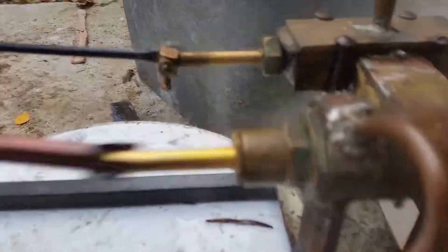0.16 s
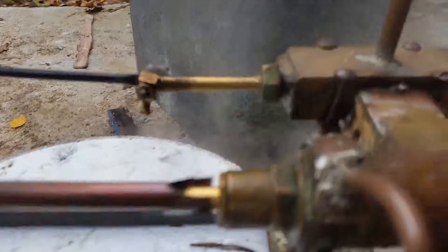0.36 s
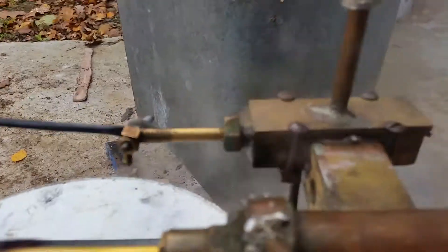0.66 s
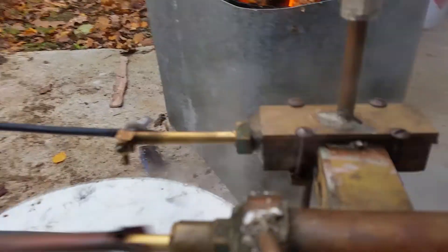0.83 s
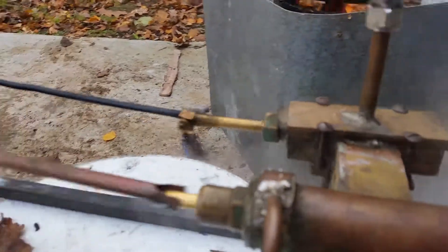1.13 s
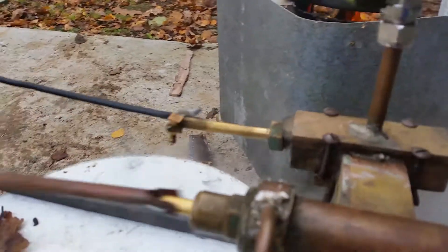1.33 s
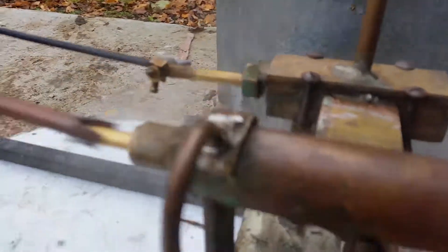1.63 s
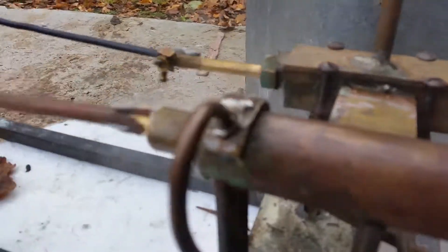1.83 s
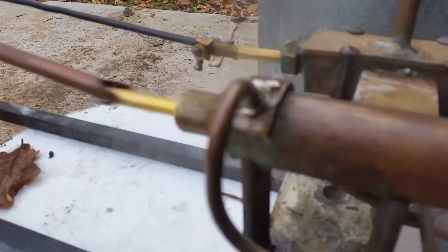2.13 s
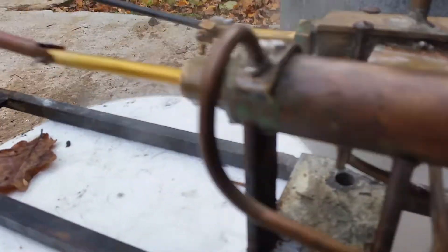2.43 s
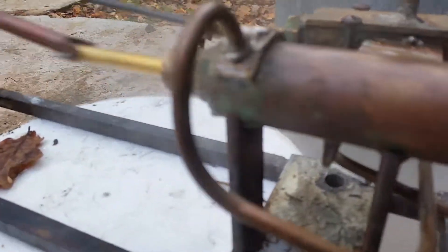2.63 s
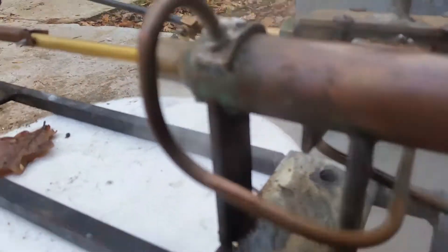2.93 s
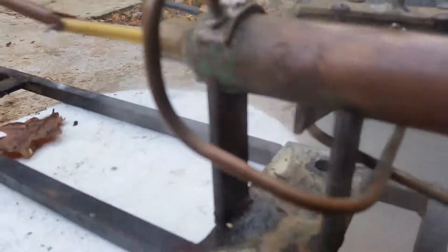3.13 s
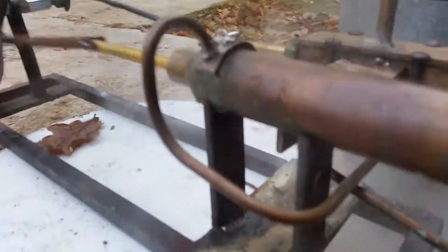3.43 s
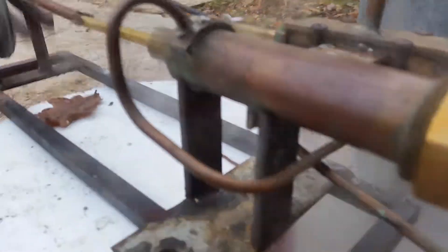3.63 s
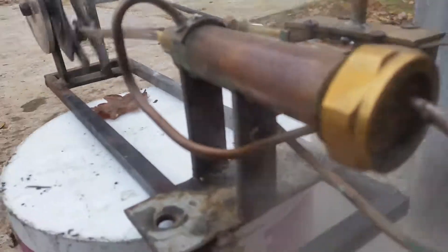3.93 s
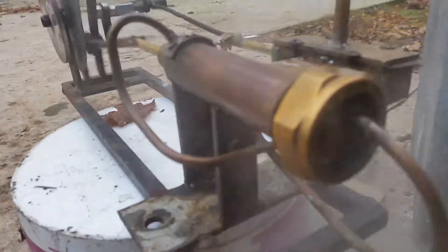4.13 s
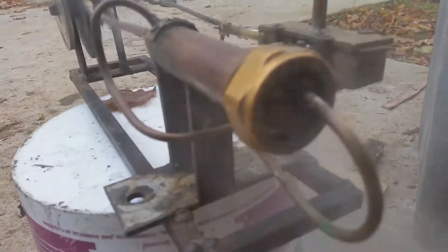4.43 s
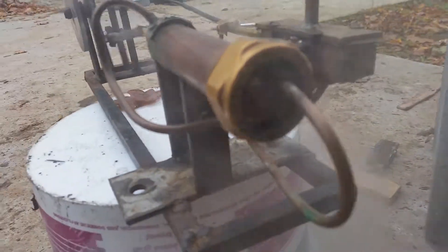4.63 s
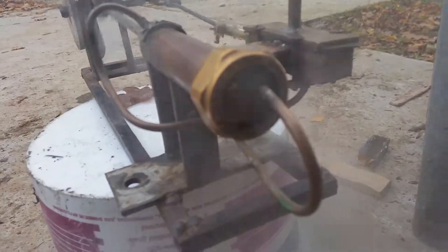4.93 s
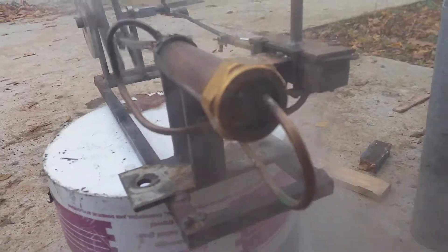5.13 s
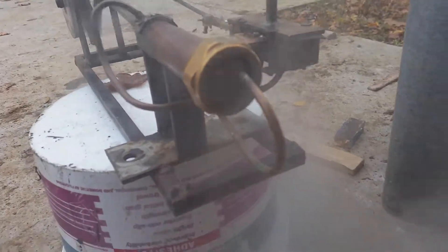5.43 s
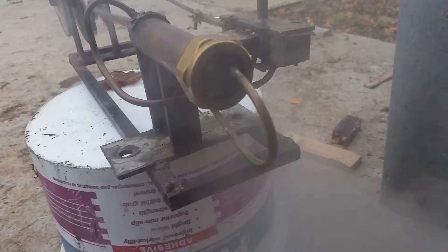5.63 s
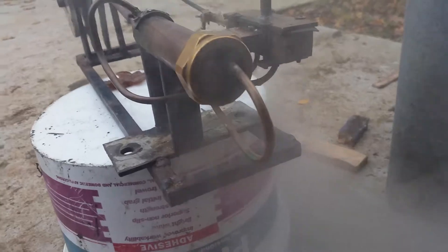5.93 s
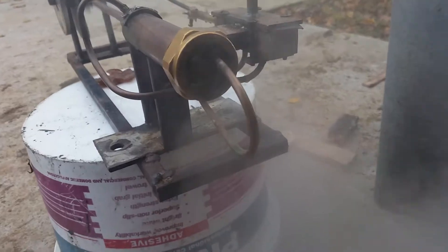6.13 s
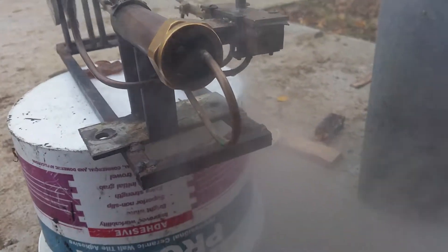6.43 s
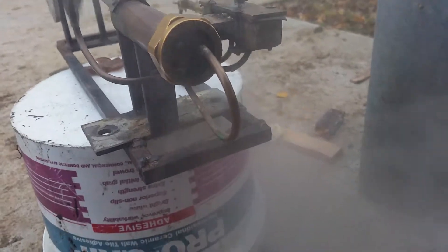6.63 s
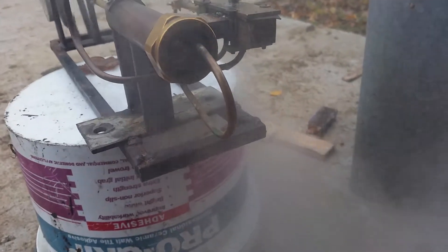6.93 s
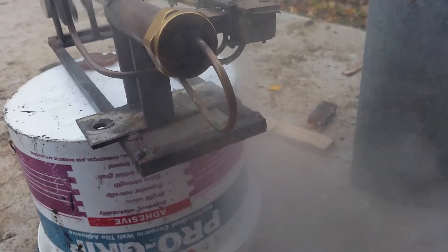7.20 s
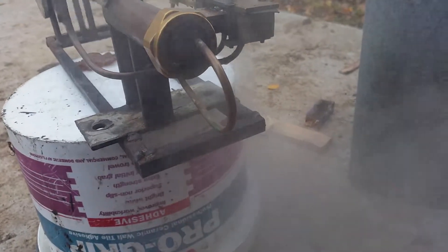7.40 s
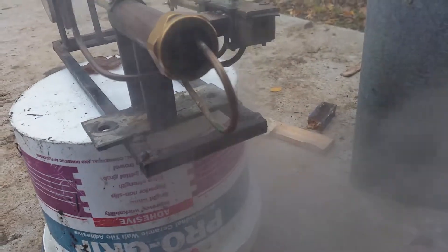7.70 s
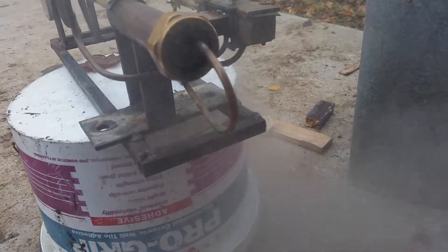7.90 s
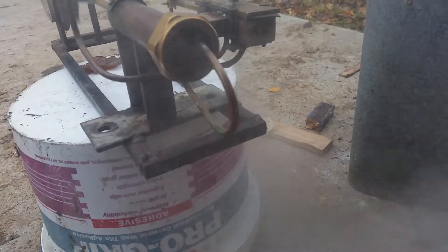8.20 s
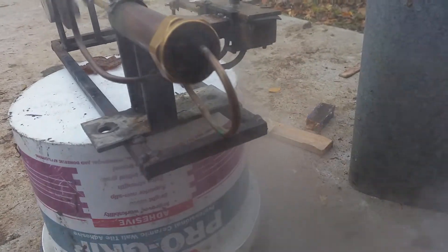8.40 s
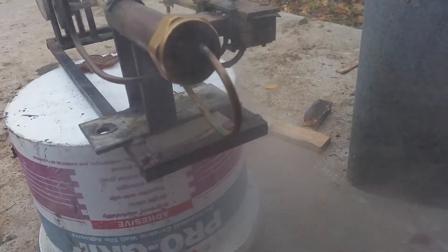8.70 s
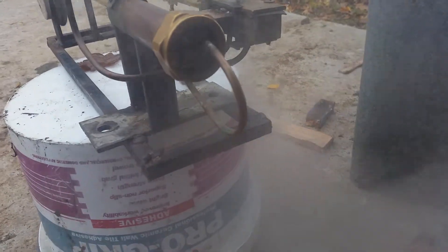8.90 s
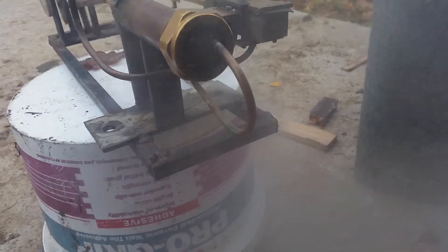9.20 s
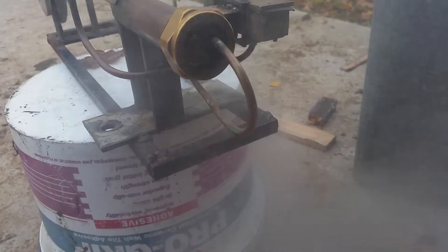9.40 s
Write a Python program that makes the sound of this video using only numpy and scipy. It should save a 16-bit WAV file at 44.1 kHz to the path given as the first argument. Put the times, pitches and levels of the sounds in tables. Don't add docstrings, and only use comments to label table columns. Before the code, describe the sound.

A rapid chuff-hiss rhythm continues from start to finish, with crisp valve ticks and a hollow iron clatter. The steam begins bright and leaning right, sweeps as the handheld microphone passes round the engine, then becomes more piped from behind while ticks fade on the left. Water splats twice at the exhaust, blunt pops strike the left side, and a low hum swells faintly under open-air fire rumble.

```python
import sys
import numpy as np
from scipy import signal
from scipy.fft import rfft, irfft, next_fast_len
from scipy.io import wavfile
from scipy.ndimage import uniform_filter1d, map_coordinates

SR = 44100
rng = np.random.default_rng(int(sys.argv[2]) if len(sys.argv) > 2 else 0)


def output_pcm(signal):
    pcm = np.clip(np.atleast_2d(signal).T, -1, 1) * 32767
    wavfile.write(sys.argv[1], SR, np.round(pcm).astype(np.int16))


def ratio_of_db(decibels):
    return 10 ** (np.asarray(decibels, float) / 20)


N = 421148
CLOCK = np.arange(N) / SR

# (time [s], pitch [Hz], level [dB])
HUM = [(0, 45.5, -42), (1.25, 44.1, -42), (1.6, 43.6, -57), (2.3, 37, -47), (3.3, 37, -49), (3.6, 37, -37),
       (4.36, 37.1, -40), (5.3, 41.8, -36.5), (6.1, 43, -39), (6.6, 42.5, -39), (7.45, 44.8, -31.5),
       (8.24, 45.2, -37.5), (9.2, 45.6, -33), (9.55, 45, -37)]
OCTAVE_DB = -6.5
# (frequency [Hz], density [dB per Hz])
RUMBLE = [(20, -23), (60, -3), (120, -10), (220, -2), (330, -3), (700, -14), (1500, -22.5)]

# (time [s], left level [dB], right minus left [dB])
POPS = [
    (2.6243, 2.5, -22),
    (5.4147, -0.5, -19),
    (6.126, 5, -27),
    (8.0773, -1, -22),
    (8.901, -4, -18),
]
LOUDEST_POP_S = POPS[2][0]
# (time [s], peak level [dB], pan [dB])
SPLATS = [
    (1.4277, -9.5, -1),
    (6.933, -13.5, -13),
]
GAIN_DROP_DB, GAIN_FALL_S, GAIN_HOLD_S, GAIN_RISE_S, GAIN_STEP = -9, 0.36, 0.39, 0.67, 0.34

# (time [s], turns done [count])
CRANK = [(.0831, 0), (1.0835, 4), (1.331, 5), (1.5739, 6), (2.2901, 9), (2.7698, 11), (3.0041, 12),
         (3.9546, 16), (4.6719, 19), (5.3975, 22), (5.8752, 24), (6.363, 26), (6.8383, 28), (7.5601, 31),
         (8.0368, 33), (8.2783, 34), (8.7486, 36), (9.481, 39)]
# (part of a turn [0-1], barrel level [dB], frame level [dB], rod level [dB])
KNOCKS = [(.01, -6.5, -6.5, 2), (.04, -14, -16.5, -0.5), (.1, -13, -18.5, -22), (.26, -13.5, -9, 2.5),
          (.35, -9.5, -11.5, -1.5), (.41, -12, -12.5, -6.5), (.56, -13, -17, -15.5), (0.74, -9.5, -6, -1.5),
          (0.798, -10.5, -12.5, -3.5)]
# (frequency [Hz], width [Hz], level [dB])
BARREL = [(89, 20, -12.5), (126.1, 15.3, 3), (162.9, 14.4, 0), (206, 16.4, -1.5), (254, 32.6, -5.5)]
# (frequency [Hz], width [Hz], level [dB])
FRAME = [(375, 54, 0.5), (455.6, 18.5, 7.5), (498.3, 18.2, 7), (592.6, 25, 4), (785, 102, 0)]
# (frequency [Hz], width [Hz], level [dB])
ROD = [(861.6, 15, 7), (934, 122, 7), (1101, 15.7, 14), (1194, 70, 6.5), (1750, 720, -40)]
KNOCK_DB, KNOCK_SCATTER_DB = 1.8, 0.95

# (frequency [Hz], level [dB], decay by 60 dB [s])
VALVE = [(8040, -27, 0.022), (10110, -7, 0.011), (10975, -1.5, 0.053), (10810, 9, 0.0068),
         (12970, -28, 0.01), (14400, -9, 0.013)]
SOFT_TURNS = [0, 1, 7, 10, 13, 16, 21, 24, 27, 31, 36]
SOFT_DB, TICK_SCATTER_DB, CLACK_DB = -5, 0.8, -16.5
TICK_DB = (-3.5, -1)
HIDDEN_S, HIDDEN_DB = 3.85, (-10, 1.5)

# (part of a turn [0-1], level [dB])
FIRST = [(.01, -18), (.04, -6.5), (.1, -1.5), (.2, 4.5), (.3, 1.5), (.345, -6.5), (.37, -70)]
# (part of a turn [0-1], level [dB])
SECOND = [(.38, -7), (.44, -11.5), (.5, 0.5), (.62, -2), (.75, -2.5), (.84, -3), (.9, -55), (.92, -65)]
# (part of a turn [0-1], level [dB], length [turns])
SPITS = [(.34, -1.5, 0.015), (.4, -6, 0.013), (.71, -3.5, 0.0075), (.82, -5.5, 0.0087), (.89, -6, .011),
         (.957, -4, 0.014)]
# (frequency [Hz], level [dB])
BRIGHT = [(1500, -1), (4000, 2.5), (8000, 2.5), (14000, -3)]
# (frequency [Hz], level [dB])
DULL = [(1500, 1), (4000, 4.5), (8000, -10), (14000, -2.5)]
# (frequency [Hz], level [dB])
SPRAY = [(1500, 6.5), (4000, 5.5), (8000, 11.5), (14000, -1)]
# (frequency [Hz], level [dB])
LEAK = [(1500, 2), (4000, -2), (8000, 3), (14000, -5.5)]
FIRST_DB, SECOND_DB, STROKE_SCATTER_DB = 0, 1.4, 0.4
LAP_AT, LAP_TURNS, LAP_DB = .92, .012, -7
PIPE_HZ, PIPE_BEHIND = 855, .34

# (time [s], steam level [dB], frame level [dB], fire level [dB])
NEAR = [(0, -25.5, -34.5, -36.5), (.7, -23.5, -27.5, -38), (1.7, -26, -30.5, -40.5),
        (2.6, -23, -28.5, -33.5), (3.5, -20.5, -27.5, -33.5), (5, -21, -27.5, -36), (5.9, -24, -30, -36),
        (8, -22, -31, -33.5), (8.6, -23, -30.5, -35.5), (9.1, -22.5, -30, -31.5), (9.55, -22.5, -28.5, -40)]
# (time [s], behind [0-1], left port lag [ms], boiler echo share [0-1], echo comb spacing [Hz])
WALK = [(.7, 0, 0.18, 0.01, 1600), (2.2, 0.04, 0.2, 0, 1680), (3.6, 0.37, 0.16, 0.04, 1604),
        (4.3, 0.58, 0.16, 0.1, 1630), (5.2, 0.66, 0.087, 0.08, 1680), (6.5, 0.79, 0.072, 0.11, 1778),
        (9.55, 0.87, 0.043, 0.18, 1710)]
# (frequency [Hz], level from the front [dB], level from behind [dB])
LEFT = [(1150, -11, -9), (4200, -11, -13), (5200, -13.5, -24.5), (6500, -21.5, -25.5), (8520, -10.5, -20.5),
        (10700, -10.5, -19), (13800, -12.5, -20.5), (15400, -25, -33)]
# (frequency [Hz], level from the front [dB], level from behind [dB])
RIGHT = [(1130, -4.5, -14), (2780, -13.5, -12.5), (3440, -5.5, -8.5), (6330, -8.5, -10), (7070, -11.5, -11),
         (9980, -6, -2.5), (14100, -3.5, -0.9), (15240, -15.5, -11)]
# (frequency [Hz], left-right coherence [0-1])
ALIKE = [(1000, .85), (2000, .7), (2900, .84), (4000, .75), (7000, .62), (15000, .68)]
# (time [s], gap pitch [Hz], gap level [dB], left beam level [dB], right beam level [dB])
GAP = [(0, 4120, 9, 0, 4.5), (1.3, 4030, 8, 0, 4.7), (2, 4200, 5.5, 3, 10.5), (3, 4136, 3, 9, 1.5),
       (3.801, 4693, 4.5, 0, -6), (4.4, 5050, 2, 1, 3), (5.6, 5200, 8, 1.3, 3.2), (9.55, 5200, 5.5, 1, -.6)]
UPPER_GAP, UPPER_SHARE = 1.093, 0.58
GAP_WIDTH_HZ, BEAM_HZ, BEAM_WIDTH_HZ = 380, 13200, 1800
# (time [s], frequency [Hz], level [dB])
HAND = [(0, 7200, -2), (1.5, 7900, -7), (2.3, 8580, -8), (3.5, 10000, -13), (3.75, 9000, -10),
        (4, 7000, -8), (5.5, 8980, -6.5), (6.2, 9300, -4.5)]
HAND_WIDTH_HZ = 760
GROUND_HZ, GROUND_BEHIND = 947.5, .55

ATTACK_DB = 4.8


def unit(x):
    return x / np.sqrt(np.mean(x ** 2) + 1e-20)


def along(points, hz, column=1):
    table = np.transpose(points)
    return np.interp(np.log(hz + 1), np.log(table[0] + 1), table[column])


def curves(rows, t=CLOCK):
    s, *columns = np.transpose(rows)
    return [np.interp(t, s, column) for column in columns]


def wobble(rate):
    return map_coordinates(rng.standard_normal(int(N * rate / SR) + 4), [np.arange(N) * rate / SR])


def filtered(x, response):
    m = next_fast_len(N + 8192, real=True)
    return irfft(rfft(x, m) * response(np.fft.rfftfreq(m, 1 / SR)), m)[..., :N]


def modes(table):
    def response(f):
        total = 0
        for k, (centre, width, db) in enumerate(table):
            total = total + (-1) ** k * ratio_of_db(db) * 1j * f * width / (centre ** 2 - f ** 2 + 1j * f * width)
        return total
    return response


def crank():
    s, done = np.transpose(CRANK)
    s = np.interp(np.arange(done[-1] + 1), done, s)
    return np.r_[2 * s[0] - s[1], s, 2 * s[-1] - s[-2]]


def yard():
    hz, db = curves(HUM)
    phase = 2 * np.pi * np.cumsum(hz) / SR
    fundamental = ratio_of_db(db + 2.1 * wobble(10)) * np.sin(phase)
    octave = ratio_of_db(db + OCTAVE_DB + 2.0 * wobble(2.94)) * np.sin(2 * phase)
    hum = np.sqrt(2) * (fundamental + octave)
    fire = filtered(rng.standard_normal((2, N)), lambda f: ratio_of_db(along(RUMBLE + [(3000, -57)], f)))
    middle, side = fire * ratio_of_db(1.45 * wobble(18))
    rumble = unit(np.array([middle + .45 * side, middle - .45 * side]))
    return hum * ratio_of_db([[-.7], [.7]]), rumble


def pops():
    out = np.zeros((2, N + SR))
    u = np.arange(1500) / SR / .0018
    step = (1 - u) * np.exp(-u) * (1 - np.exp(-u / 0.069))
    for s, db, right_db in POPS:
        out[:, round(s * SR):][:, :len(u)] += ratio_of_db([[db], [db + right_db]]) * step
    return out[:, :N]


def splats():
    out, t = np.zeros((2, N + SR)), np.arange(400) / SR
    for s, db, pan_db in SPLATS:
        port_db = db + 3 + np.array([[.5], [-.5]]) * pan_db
        out[:, round(s * SR):][:, :len(t)] += ratio_of_db(port_db - 60 * t / .009) * rng.standard_normal(len(t))
    return filtered(out[:, :N], modes([(4760, 3500, 0)]))


def gain_db():
    knots = LOUDEST_POP_S + np.cumsum([0, GAIN_FALL_S, GAIN_HOLD_S, GAIN_RISE_S])
    return GAIN_DROP_DB * np.interp(CLOCK, knots, [GAIN_STEP, 1, 1, 0], left=0)


def knocks():
    edges, t = crank(), np.arange(2000) / SR
    strength = KNOCK_DB + KNOCK_SCATTER_DB * rng.standard_normal(len(edges))
    rub_db = 6.0 * np.pad([wobble(25), wobble(25), wobble(25)], ((0, 0), (0, SR)))
    force = ratio_of_db([[-17], [-15], [-18]]) * rng.standard_normal((3, N + SR)) * ratio_of_db(rub_db)
    push = 3 * ratio_of_db(-60 * t / 0.0033)
    rattle_shape = ratio_of_db(-60 * t / 0.093) * (1 - np.exp(-t / 0.00097))
    for start, end, turn_db in zip(edges, edges[1:], strength):
        for at, *group_db in KNOCKS:
            part = at + rng.normal(0, 0.00612)
            i = round((start + part * (end - start)) * SR)
            blow = push + rattle_shape * rng.standard_normal((3, len(t)))
            size = ratio_of_db(turn_db + np.array(group_db) + rng.normal(0, 2.3, 3))
            if i >= 0:
                force[:, i:i + len(t)] += size[:, None] * blow
    barrel, frame, rod = (unit(filtered(f[:N], modes(m))) for f, m in zip(force, (BARREL, FRAME, ROD)))
    return unit(barrel + ratio_of_db(-4.0) * frame + ratio_of_db(-4.5) * rod)


def ticks():
    out, clacks, t = np.zeros((2, N + SR)), np.zeros(N + SR), np.arange(1500) / SR
    for k, s in enumerate(crank()[1:-1]):
        i = round(s * SR)
        db = np.add(TICK_DB, np.multiply(HIDDEN_DB, s > HIDDEN_S)) + SOFT_DB * (k in SOFT_TURNS)
        ring = 0
        for hz, level, t60 in VALVE:
            envelope = ratio_of_db(level + rng.normal(0, 0.37, (2, 1)) - 60 * t / t60)
            ring = ring + envelope * np.sin(2 * np.pi * hz * t + rng.uniform(0, 11.2, (2, 1)))
        crack = 2.1 * ratio_of_db(-60 * t / .01) * rng.standard_normal((2, len(t)))
        snap = (ring + crack) * (1 - np.exp(-t / .0005))
        snap = snap + .5 * np.pad(snap, ((0, 0), (70, 0)))[:, :len(t)]
        size = ratio_of_db(db - 8.0 + TICK_SCATTER_DB * rng.standard_normal(2))
        out[:, i:][:, :len(t)] += size[:, None] * snap
        clack = ratio_of_db(CLACK_DB - 60 * t / .06) * (1 - np.exp(-t / .0015)) * rng.standard_normal(len(t))
        clacks[i:][:len(t)] += clack
    bright = filtered(out[:, :N], modes([(11000, 8500, -.5)]))
    return bright + filtered(clacks[:N], modes([(2500, 2000, 0)]))


def steam_gates():
    count = len(crank())
    turns = np.interp(CLOCK, crank(), np.arange(count))
    whole, part = turns.astype(int), turns % 1
    stroke_db = np.array([FIRST_DB, SECOND_DB]) + STROKE_SCATTER_DB * rng.standard_normal((count, 2))
    first_db, second_db = stroke_db[whole].T
    scatter = rng.standard_normal((count, len(SPITS), 2))
    spits = 0
    for k, (at, db, length) in enumerate(SPITS):
        level, shift = scatter[whole, k].T
        pulse = np.exp(-((part - at - 0.0021 * shift) / length) ** 2)
        spits = spits + ratio_of_db(db + 2 * np.tanh(level)) * pulse

    def opening(table):
        return ratio_of_db(np.interp(part, *np.transpose(table), left=-60, right=-60))

    lap_db = LAP_DB * np.exp(-((part - LAP_AT) / LAP_TURNS) ** 2)
    leak = ratio_of_db(-4 + 2.3 * curves(WALK)[0] + lap_db)
    return [ratio_of_db(first_db) * opening(FIRST), ratio_of_db(second_db) * opening(SECOND), spits, leak]


def steam_jets():
    pipe_returns = [.2, .35, .15, .2]
    jets = 0
    for gate, colour, back in zip(steam_gates(), (BRIGHT, DULL, SPRAY, LEAK), pipe_returns):
        flutter = ratio_of_db(1.2 * wobble(60) + 1.2 * wobble(250))
        hz, t, z = signal.stft(gate * flutter * rng.standard_normal((2, N)), SR, nperseg=1024)
        pipe = ratio_of_db(along(colour, hz)) / (1 - back * np.exp(-2j * np.pi * hz / PIPE_HZ))
        jets = jets + z * pipe[:, None]
    clouds = uniform_filter1d(rng.standard_normal(jets.shape[1:]), size=10, axis=0)
    clouds = uniform_filter1d(clouds, size=2, axis=1)
    return hz[:, None], t, jets * ratio_of_db(2.2 * unit(clouds))


def steam():
    hz, t, (own, shared) = steam_jets()

    def delayed(spacing_hz):
        return np.exp(-2j * np.pi * hz / spacing_hz)

    behind, lag_ms, share, comb_hz = curves(WALK, t)
    lag_ms = lag_ms + .014 * np.interp(t, CLOCK, wobble(9))
    gap_hz, gap_db, left_beam_db, right_beam_db = curves(GAP, t)
    beam = np.exp(-((hz - BEAM_HZ) / BEAM_WIDTH_HZ) ** 2)

    def port_gain(port, beam_db):
        return ratio_of_db((1 - behind) * along(port, hz) + behind * along(port, hz, column=2) + beam_db * beam)

    left, right = port_gain(LEFT, left_beam_db), port_gain(RIGHT, right_beam_db)
    hand_hz, hand_db = curves(HAND, t)
    left = left * ratio_of_db(hand_db * np.exp(-((hz - hand_hz) / HAND_WIDTH_HZ) ** 2))

    def ring(centre_hz):
        return 1 / (1 + ((hz - centre_hz) / GAP_WIDTH_HZ) ** 2)

    right = right * ratio_of_db(gap_db * (ring(gap_hz) + UPPER_SHARE * ring(UPPER_GAP * gap_hz)))
    bounce = GROUND_BEHIND * behind / (1 + (5000 / (hz + 1)) ** 8 + (hz / 8800) ** 8)
    left = left * (1 - bounce * delayed(GROUND_HZ))
    detour_ms = lag_ms / (1 + (2000 / (hz + 1)) ** 6)
    alike = along(ALIKE, hz)
    lagging = np.exp(-2j * np.pi * hz * detour_ms / 1000) * shared
    left = left * (np.sqrt(1 - alike ** 2) * own + alike * lagging)
    wall = share / (1 + (3600 / (hz + 1)) ** 4)
    right = right * shared * (1 + wall * delayed(comb_hz)) ** 2
    down_pipe = 1 + PIPE_BEHIND * behind / (1 + (hz / 7000) ** 2) * delayed(PIPE_HZ)
    low_cut = hz ** 2 / (hz ** 2 + 1100 ** 2)
    pair = signal.istft(down_pipe * np.array([left, right]) * low_cut, SR, nperseg=1024)[1][:, :N]
    return pair / np.std(pair.mean(axis=0))


def scene():
    steam_db, frame_db, fire_db = curves(NEAR)
    hum, rumble = yard()
    iron = knocks()
    echo = .24 * np.pad(iron, (260, 0))[:N]
    iron = np.array([iron + echo, 1.07 * iron - echo])
    engine = ratio_of_db(steam_db) * steam() + ratio_of_db(frame_db) * iron + ratio_of_db(fire_db) * rumble + ticks() + hum
    since = CLOCK - LOUDEST_POP_S
    duck = 1 - 0.66 * (since > 0) * (since < .022)
    return (engine * ratio_of_db(gain_db()) + splats()) * uniform_filter1d(duck, size=60) + pops()


def drop_faint_bands(x):
    hz, t, z = signal.stft(x, SR, nperseg=1024)
    hz = hz[:, None]
    paired = hz < 3300
    z = np.where(paired, [z[0] + z[1], z[0] - z[1]], np.sqrt(2) * z)
    bands = (abs(z[:, :-1]) ** 2).reshape(2, -1, 4, len(t)).mean(axis=2)
    treble = bands[0, 58:68].mean(axis=0)
    attack = treble > ratio_of_db(2 * ATTACK_DB) * uniform_filter1d(treble, size=21)
    bands = uniform_filter1d(bands, size=4, axis=2)
    power = np.pad(np.repeat(bands, 4, axis=1), ((0, 0), (0, 1), (0, 0)))
    loudness = bands[:, 16:88].mean(axis=(0, 1))
    threshold = [(2300, -30), (2650, -8.5), (3100, -8.5), (3500, -15), (6000, -14.5),
                 (12000, -15.5), (14500, -15), (15600, -12), (15800, 3)]
    audible = power > loudness * ratio_of_db(2 * along(threshold, hz))
    z = z * (audible | attack & (hz < 15850)) * (hz < 16450)
    z = np.where(paired, [(z[0] + z[1]) / 2, (z[0] - z[1]) / 2], z / np.sqrt(2))
    return signal.istft(z, SR, nperseg=1024)[1][:, :N]


def band_limit(x):
    return signal.sosfilt(signal.butter(12, 16510, fs=SR, output="sos"), x)


def record(dry):
    mix = drop_faint_bands(np.clip(dry, -1, 1))
    return band_limit(mix)


dry = scene()
out = record(dry)
output_pcm(out)
```